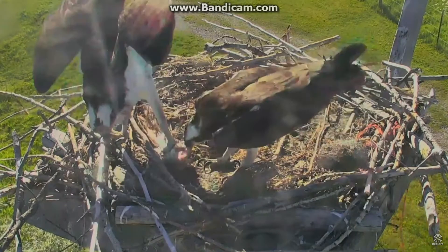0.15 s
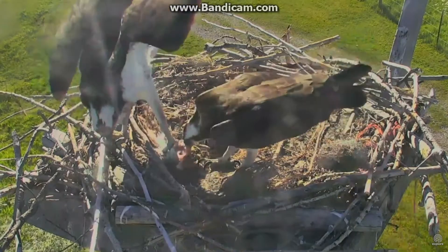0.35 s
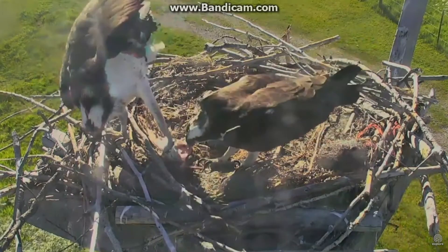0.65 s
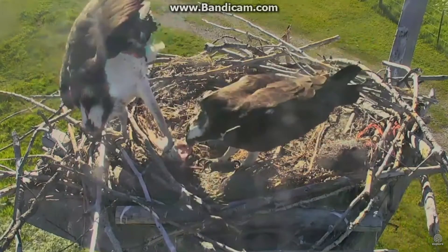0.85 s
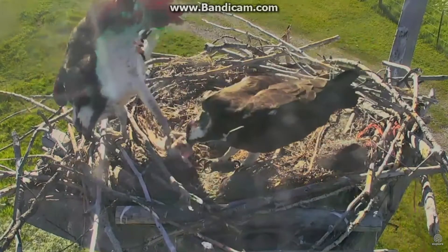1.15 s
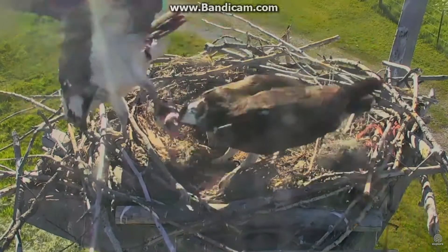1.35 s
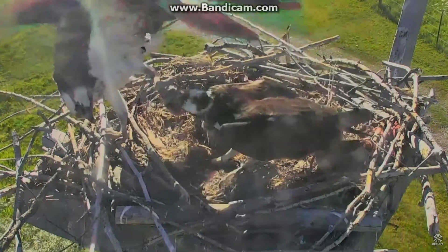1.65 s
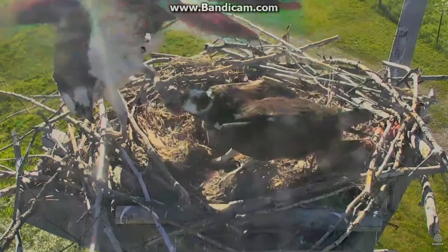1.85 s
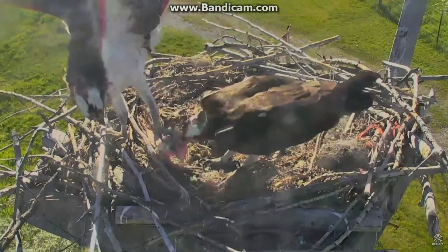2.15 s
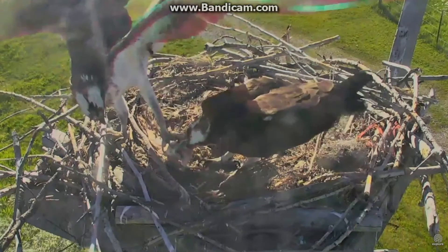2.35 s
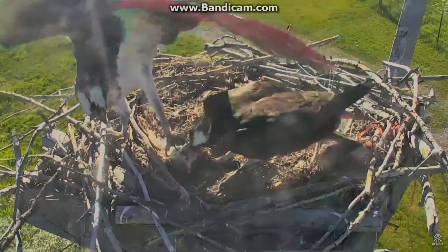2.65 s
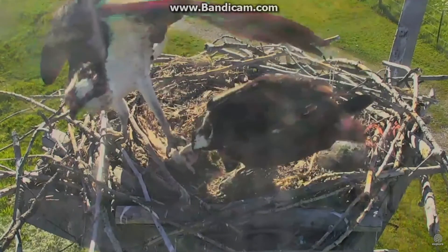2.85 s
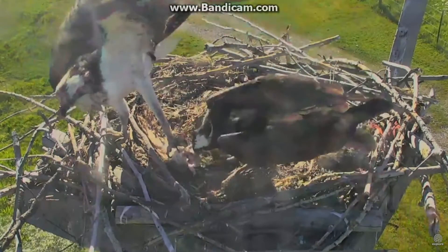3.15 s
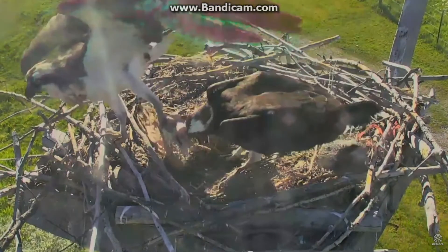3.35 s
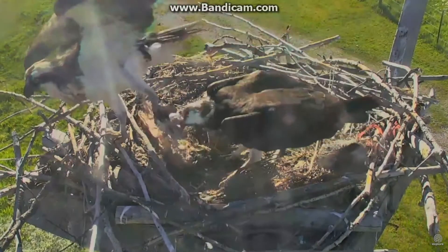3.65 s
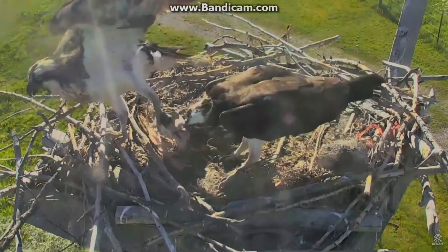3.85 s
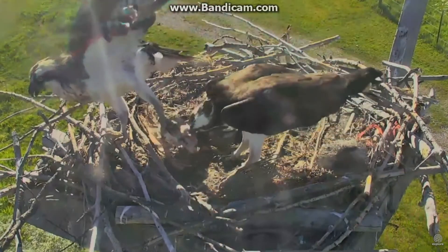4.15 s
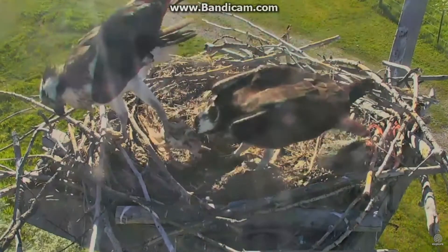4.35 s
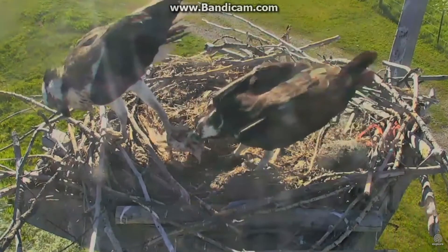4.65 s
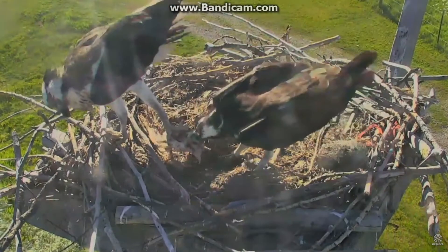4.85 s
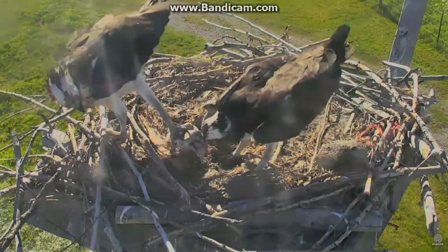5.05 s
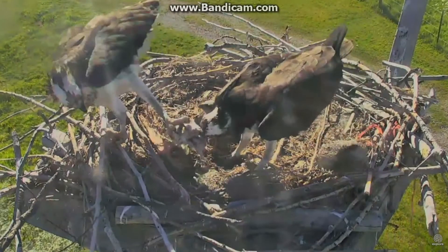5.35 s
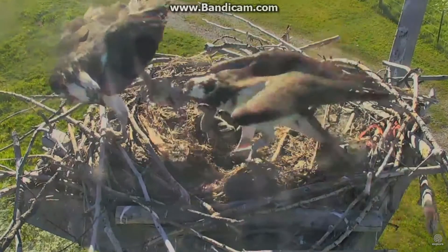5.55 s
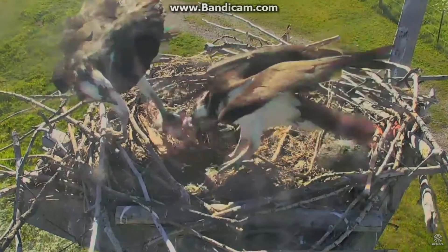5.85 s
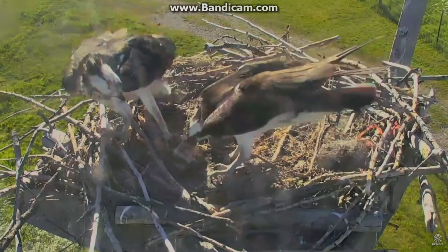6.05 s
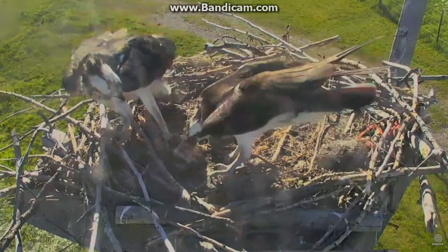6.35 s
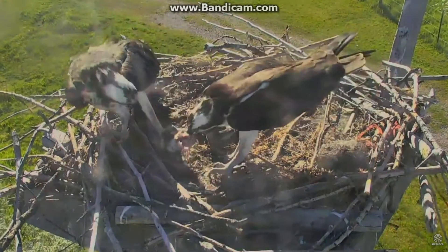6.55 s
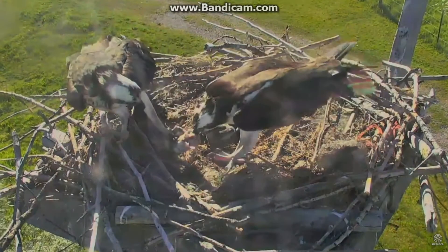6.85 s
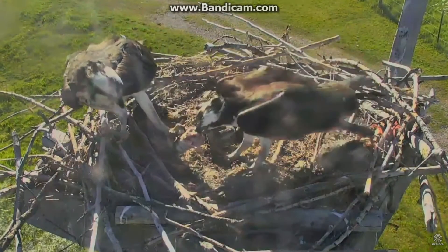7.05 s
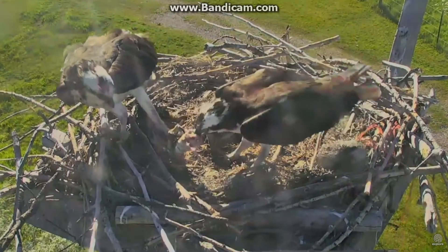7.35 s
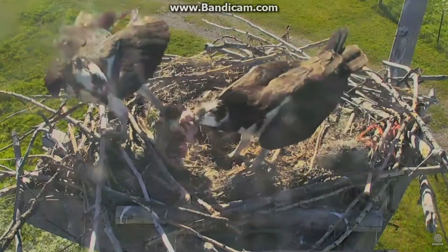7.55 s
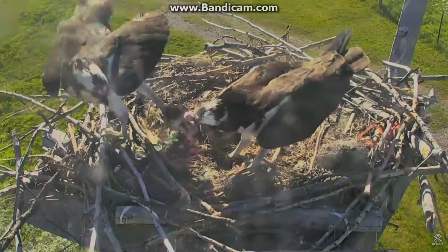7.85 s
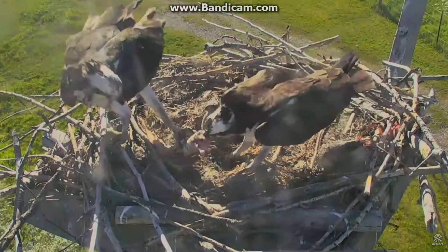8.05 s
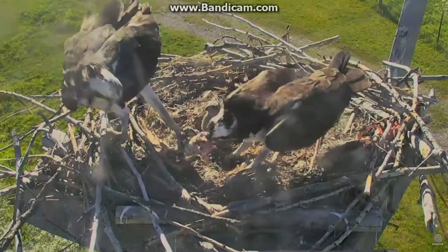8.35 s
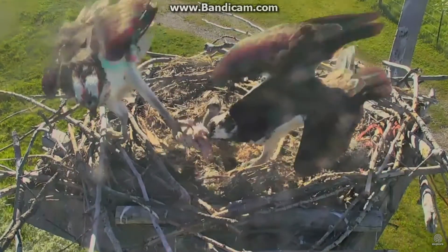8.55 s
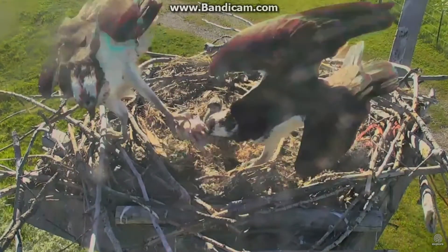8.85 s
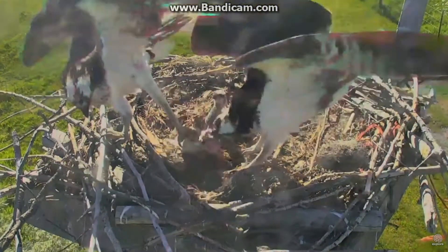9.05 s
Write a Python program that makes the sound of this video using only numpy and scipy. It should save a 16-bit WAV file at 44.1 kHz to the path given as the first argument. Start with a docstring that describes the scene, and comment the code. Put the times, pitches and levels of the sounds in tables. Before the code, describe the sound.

Two ospreys at an open-air nest give piercing, rapid whistled chirps that crack and rasp, very close and overloaded, over faint wind and rustling.

```python
"""Two ospreys call at their nest, close to one overloaded microphone.
Piercing whistles, near sines with an octave, break into low yelps, half tones and rasp until about 4.3 s.
After a pause they resume at 5 s; near 6.4 and 7.5 s the mate's tone joins in and the overload mixes the two.
Throughout, thin songbird tones, crackling rustles, decaying twig snaps and coloured wind noise lie behind.
Gain control pulls the background down after each call, and it recovers as the held level sinks."""
import sys
import numpy as np
from scipy import signal
from scipy.fft import rfft, irfft
from scipy.io import wavfile
from scipy.ndimage import uniform_filter1d

SR = 44100
rng = np.random.default_rng(int(sys.argv[2]) if len(sys.argv) > 2 else 0)


def int16_out(signal):
    """Quantize to a 16-bit WAV file."""
    q = np.round(np.clip(np.atleast_2d(signal).T, -1, 1) * 32767)
    wavfile.write(sys.argv[1], SR, q.astype(np.int16))


N = 405279
T = np.arange(N) / SR  # s

# Colour the throat gives the hoarse voice. Each row: frequency in hertz, relative level in dB.
THROAT = [(440, -78), (750, -50), (1340, -16.5), (1490, -38), (1900, -8), (2360, -36), (2710, -50),
          (3300, -2.5), (5330, -20), (6500, -19), (8450, -6.5), (14300, -120)]
# Curve of scoop and droop: power, extra power per second of note length
NOTE_BEND = (2, 0)
# Hertz under the top of a note at which the voice is 10 dB down: before the top, after it
WHISTLE_REACH = (261, 215)


def gain_of(db):
    """Decibel law: 20 dB is a factor of ten in amplitude."""
    return 10 ** (np.asarray(db) / 20)


def read(points, hz):
    """Logarithmic frequency scale: a level is interpolated along it between the points."""
    f, value = np.transpose(points)
    return np.interp(np.log(hz + 1), np.log(f + 1), value)


def noise(spectrum):
    """Spectral shaping: white noise takes the given colour, at rms 1."""
    white = rfft(rng.standard_normal(N))
    colour = gain_of(read(spectrum, np.fft.rfftfreq(N, 1 / SR)))
    x = irfft(white * colour, N)
    return x / x.std()


def gate(spans, edge_s):
    """Envelope: one inside any span, with edges softened by two running means."""
    inside = sum((T >= a) & (T <= b) for a, b in spans) > 0
    size = max(round(edge_s * SR), 1)
    return uniform_filter1d(uniform_filter1d(inside * 1., size), size)


def track(notes, bend, reach_hz, edge_s):
    """Frequency modulation: notes scoop, drift and droop; level follows pitch, phase is its integral."""
    edge_sag = .1  # share by which the pitch sags while the voice sets in or breaks off
    fall_power = 1.67  # the loss grows faster than the pitch drops
    curves = np.zeros((3, N))
    # First with margins, latest note first; then each note's own stretch on top
    for margin_s in (.015, 0):
        ordered = notes[::-1 if margin_s else 1]
        for start, length, held_hz, scoop_hz, droop_hz, level_db, fade_db, *more in ordered:
            drift_hz, octave_db = more or (0, 0)
            first = max(round((start - margin_s) * SR), 0)
            at = slice(first, round((start + length + margin_s) * SR))
            done = np.clip((T[at] - start) / length, 0, 1)
            power = bend[0] + bend[1] * length
            hz = held_hz + drift_hz * (done - .5)
            hz = hz - scoop_hz * (1 - done) ** power - droop_hz * done ** power
            before_top = done < done[hz.argmax()]
            under = (hz.max() - hz) / np.where(before_top, *reach_hz)
            db = level_db - 10 * under ** fall_power - fade_db * done ** 2
            curves[:, at] = hz, db, db + octave_db
    hz, db, octave_db = uniform_filter1d(curves, size=260)
    spans = np.array([(row[0] + .003, row[0] + row[1] + .003) for row in notes])
    # Notes that nearly touch are slurred together
    slurred = np.flatnonzero(abs(spans[1:, 0] - spans[:-1, 1]) < .013)
    spans[slurred, 1] = spans[slurred + 1, 0] + .001
    sounding = gate(spans, edge_s)
    hz = hz * (1 - edge_sag * (1 - sounding))
    turns = np.cumsum(hz) / SR
    return turns, hz, sounding * gain_of(db), sounding * gain_of(octave_db)


def tone(turns):
    """Simple harmonic motion: a sinusoid of rms 1, its phase given in turns."""
    return np.sqrt(2) * np.cos(2 * np.pi * turns)


def whistles():
    """Self-sustained membrane: a near sine; strain makes it repeat every few cycles or change pattern."""
    # Upper-register notes. Each row: start in seconds, length in seconds, held pitch in hertz,
    # scoop up in hertz, droop in hertz, level in dB, fade in dB, drift in hertz, octave in dB re whistle.
    upper_notes = [(0.0, 0.067, 2455, -40.0, -110.0, 3.5, 5, 86, -12.5),
                   (0.065, 0.11, 2840, 150.0, 380.0, 3.5, -6, -190.0, -12),
                   (0.535, 0.061, 2526, 19.5, 198.5, 1.5, 6.0, -110.0, -7.5),
                   (0.61, 0.097, 3187, 410.0, 230.5, 8.5, 5.5, 203, -30),
                   (0.705, 0.075, 2580, -180.0, 290.0, 11, -11, -100.0, -2),
                   (0.915, 0.057, 2543, 60.5, 160.5, 2.0, 3.5, -5.5, -2),
                   (0.97, 0.078, 2144, -190.0, -420.0, -1.5, -3, -180.0, -1),
                   (1.04, 0.078, 2787, 200.0, 580.0, 14.5, 2, -150.0, -3.5),
                   (1.268, 0.067, 2510, 80.0, 280.0, 6, 10, -170.0, -9.5),
                   (1.378, 0.06, 2713, 220.0, 410.0, 14, -3.5, -200.0, -7),
                   (1.733, 0.065, 2798, 350.0, 550.0, 16, -5, -300.0, -9.5),
                   (1.895, 0.077, 2570, 260.0, 100.5, 3, -9, 23, -13.5),
                   (1.985, 0.094, 2550.0, 70.0, -110.0, 11.5, 8, -250.0, -17),
                   (2.08, 0.074, 2830, 360.5, 460.0, 17, -9.5, -320.0, -14.5),
                   (2.293, 0.1, 2815, 320.0, 160.0, 16, 3, -180.0, -14),
                   (2.4, 0.066, 2756, 230.0, 449.5, 13.5, -11.5, -250.0, -11),
                   (2.632, 0.075, 2509, 31.5, 260.0, 4.5, 8.0, -110.0, -13.5),
                   (2.743, 0.056, 2746, 160.0, 290.0, 17.5, -0.5, -280.0, -15.5),
                   (2.978, 0.14, 2806, 270.0, 320.0, 15.5, -8.5, -150.0, -13),
                   (3.118, 0.056, 2450, 21.5, 260.0, 8, 1.5, -92, -12.0),
                   (3.537, 0.045, 2518, 40.0, 169.5, 7, 12, 23, -21),
                   (3.58, 0.073, 1943, -240.0, -520.0, 14.5, 19.5, 109, -3.5),
                   (3.665, 0.09, 2640.0, 230.0, 190.0, 11.5, -5, -160.0, -19.5),
                   (4.008, 0.27, 2690, 60.0, 250.0, 6, 4.5, 267, -13.5),
                   (5.05, 0.086, 2460, 179.5, -20.0, 2, -4, -420.0, -7.5),
                   (5.14, 0.05, 2513, 50.5, 370.0, 6, 11, -200.0, -1),
                   (5.463, 0.044, 2522, 29.5, 229.5, 2.5, -5.5, -140.0, -9.5),
                   (5.715, 0.073, 2406, 100.0, -270.0, 3.5, 8, -460.0, -10),
                   (5.8, 0.047, 2604, 100.5, 230.0, 10.5, 4, -160.0, -10),
                   (5.935, 0.12, 2693, 410.0, 109.5, 4.5, -1.5, -40.5, -11.5),
                   (6.05, 0.089, 2517, -0.0, -130.0, 13, 0.0, -360.0, -13.5),
                   (6.14, 0.071, 2840, 536, 610.0, 12.5, -11.5, 20.5, -13),
                   (6.25, 0.245, 2927, 249.5, 470.0, 8, -2.5, 100.5, -25),
                   (6.505, 0.066, 2726, 140.0, 470.0, 16.5, -12, -220.0, -11),
                   (6.735, 0.084, 2703, -130.0, 200.0, 13, 5, 580.0, -19.5),
                   (6.83, 0.07, 2747, -11.5, -120.0, 9, 1, -60.0, -8.5),
                   (6.9, 0.122, 2945, 120.0, 489, 13, -3.5, -10.0, -27),
                   (7.065, 0.15, 2863, 101.5, 430.5, 17.5, -7, -70.5, -14),
                   (7.345, 0.26, 2694, 89.5, 229.5, 9, 3.5, 110.0, -13),
                   (7.728, 0.18, 2822, 160.0, 391.5, 9, -9, 20.0, -12),
                   (8.03, 0.195, 2719, 150.0, -120.0, 12, -1, -140.0, -12.5),
                   (8.22, 0.17, 2899, 105, 739.5, 12.5, -4, 100.5, -20.5),
                   (8.46, 0.045, 2884, 137, -29.5, -4.0, 8.0, 41, -17),
                   (8.508, 0.051, 2603, 125.5, 240.5, 13, 11, -180.0, -4.5),
                   (8.675, 0.069, 2684, 349, 448.5, 1.5, 0, -32, -18),
                   (8.78, 0.12, 2868, 128, 622.5, 5.5, -2.5, -61.5, -12.5),
                   (8.898, 0.032, 2493, -13, 329, 18, 16, -150.0, -10),
                   (9.08, 0.091, 2715, 110.0, 382, 16.5, 10, 133.5, -16.5),
                   (9.165, 0.024, 2814, 562, 130.0, 2.5, 0.0, 90.0, -13.0)]
    # Strained stretches. Each row: start in seconds, end in seconds, rasp drive in dB before mixing,
    # cycles per repeat, undertones in dB re whistle before the surges.
    strained = [(0.057, 0.182, -7, 3, -31), (0.638, 0.8, -11, 2, -29), (1.892, 1.983, -23, 4, -11.5),
                (3.111, 3.176, -18.5, 4, -13), (3.536, 3.68, -16.5, 2, -6), (3.661, 3.781, -17, 4, -42),
                (4.001, 4.141, -9, 4, -37), (4.113, 4.271, -11, 6, -11), (5.721, 5.79, -23.5, 2, -17.5),
                (5.802, 5.859, -25, 4, -27), (5.941, 6.054, -9.5, 4, -14), (6.25, 6.4, -13.5, 4, -22),
                (6.367, 6.442, -18, 8, -11), (6.431, 6.506, -10.5, 4, -29), (6.731, 6.921, -9.5, 2, -39),
                (6.876, 7.025, -15.5, 2, -50), (7.112, 7.207, -69, 2, -37), (7.342, 7.614, -8.5, 2, -16),
                (7.729, 7.791, -27, 3, -41), (7.784, 7.899, -28, 2, -46.5), (8.015, 8.254, -14, 6, -43),
                (8.201, 8.387, -12, 2, -18), (8.661, 8.737, -7, 2, -26.5), (8.774, 8.881, -3, 2, -12.5),
                (9.154, 9.185, -5.5, 2, -23)]
    turns, hz, level, octave = track(upper_notes, (2.5, 20), WHISTLE_REACH, edge_s=0.0065)
    rasp = np.full(N, gain_of(-32.5))
    under, broken = np.zeros(N), np.zeros(N)
    slip = 0.085 * noise([(5, 10.5), (40, 15), (200, -66)])  # turns: the held pattern wanders
    for a, b, rasp_db, cycles, under_db in strained:
        at = slice(round(a * SR), round(b * SR))
        window = signal.windows.tukey(len(T[at]), .4)
        rasp[at] += gain_of(rasp_db) * window
        comb = undertones(turns[at] + slip[at], hz[at], round(cycles), scatter_db=-1.5)
        under[at] += gain_of(under_db) * window * comb
    span = 1800  # samples
    # In the rasp a new repeat pattern takes over every 20 ms
    for start in range(0, N - span, span // 2):
        at = slice(start, start + span)
        if rasp[at].max() > .03 and hz[at].min() > 0:
            comb = undertones(turns[at], hz[at], rng.integers(2, 8), scatter_db=7.0)
            broken[at] += np.sqrt(np.hanning(span)) * comb
    surge = gain_of(0.74 * noise([(5, -2.5), (40, 29.5), (150, -19)]))  # strain comes in bursts
    erratic = [(20, 5.0), (150, 8.5), (700, 2.5), (1500, -8.5), (3000, -66)]
    shiver_hz = 60 * rasp * noise([(10, -7), (30, 1.0), (80, -1.5), (200, -31.5)])
    waver = np.cumsum(shiver_hz) / SR
    turns = turns + waver + 0.081 * rasp * surge * noise(erratic)
    flutter = gain_of(1.1 * noise([(10, -3), (40, 0), (120, -8), (400, -40)]))  # the level wavers
    swing = flutter + 0.94 * rasp * surge * noise(erratic)
    hoarse = rasp * (0.78 * broken + 0.38 * noise(THROAT)) + under
    clear = level * tone(turns) + octave * tone(2 * turns + 0.17)
    return swing * clear + level * surge * hoarse


def undertones(turns, hz, cycles, scatter_db):
    """Subharmonics: a vibration that repeats only every few cycles has lines between its overtones."""
    k = np.array([k for k in range(1, 3 * cycles) if k % cycles])[:, None]
    throat_db = read(THROAT, hz.mean() * k / cycles)
    size = gain_of(throat_db + scatter_db * rng.standard_normal(k.shape))
    lines = size * tone(turns * k / cycles + rng.random(k.shape))
    comb = lines.sum(0)
    return comb / (comb.std() + 1e-9)


def yelps():
    """Harmonic series of a slack, shaky membrane: the octave is about as strong as the pitch."""
    # Lower-register notes that open and close the calls. Each row: start in seconds, length in seconds,
    # held pitch in hertz, scoop up in hertz, droop in hertz, level in dB, fade in dB.
    lower_notes = [(0.1, 0.061, 1870.0, -91, -59.5, -12, 0), (0.165, 0.026, 1780, -110.0, 269.5, 1, 4),
                   (0.503, 0.13, 1745, 100.5, 20.0, -4.5, 12.5), (0.645, 0.1, 1830, 20.5, 19, -13, 30),
                   (0.745, 0.053, 1880.0, 101.5, 418.5, -11.5, -5),
                   (3.17, 0.017, 1578, -30.0, 91, -14.5, 23), (3.51, 0.03, 1652, -60.5, -140.0, 0, 13),
                   (3.758, 0.021, 1655, -120.0, 138.5, 3.5, 17),
                   (4.125, 0.13, 1810.0, -18, -160.0, -8.5, 2.5),
                   (4.26, 0.046, 1823, -120.0, 281, -0.5, -1.5),
                   (5.04, 0.017, 1902, 100.5, 109.5, -13.5, 8.0), (6.225, 0.038, 1888, 285, 163, -6, 11),
                   (6.495, 0.025, 1702, -56.5, 313.5, -2.5, 15), (6.738, 0.028, 1898, 307.5, 62, 1, 23),
                   (7.022, 0.023, 1718, -53, 173.5, -2.5, 9), (7.047, 0.024, 2040, 32, 12.5, 0, 11.5),
                   (7.328, 0.027, 1669, -130.0, -390.0, 2, 15.5),
                   (7.607, 0.023, 1796, -19.5, 289, -0.5, 13), (7.73, 0.033, 2075, 145, 22, -10.5, 8.5),
                   (7.897, 0.021, 1901, 6, 350.5, -6.5, 11), (8.005, 0.035, 1753, -37.5, -260.0, -2, 11.5),
                   (8.37, 0.028, 1707, -180.0, 261.5, 4, 6), (8.875, 0.018, 1591, -240.0, 200.5, 0.5, 9),
                   (9.14, 0.05, 2033, 368.5, 78, -5, 8.5)]
    # Harmonics of the yelp. Each row: multiple of the pitch, gain in dB.
    overtones = [(1, 7.5), (2, 5.5), (3, -4.5), (4, -7.5), (5, -56)]
    turns, _, level, _ = track(lower_notes, NOTE_BEND, (530, 225), edge_s=0.0045)
    turns = turns + 0.032 * noise([(20, 17.5), (200, -8), (800, -13), (2000, -30)])
    return level * sum(gain_of(db) * tone(round(k) * turns) for k, db in overtones)


def mate():
    """Intermodulation: a second whistle just under the first, mixed into a comb by the overload."""
    # The mate's notes where both call at once. Each row: start in seconds, length in seconds,
    # held pitch in hertz, scoop up in hertz, droop in hertz, level in dB, fade in dB.
    mate_notes = [(6.375, 0.07, 2687, 171.2, 199.5, 7, 7), (7.5, 0.06, 2682, 30.1, 155, 12, 6)]
    turns, _, level, _ = track(mate_notes, NOTE_BEND, WHISTLE_REACH, edge_s=0.007)
    return level * tone(turns)


def songbirds():
    """Amplitude modulation: small birds' thin tones flutter, as if from echoes across the field."""
    # Notes of small birds further off. Each row: start in seconds, length in seconds,
    # held pitch in hertz, scoop up in hertz, droop in hertz, level in dB, fade in dB.
    song = [(0.27, 0.039, 4530, -300.0, -500.0, -38, -2), (0.32, 0.05, 3370.0, -1940.0, -320.0, -30.0, 8),
            (0.37, 0.092, 3520, -350.0, 521.5, -28.5, 2.0), (1.33, 0.037, 3580, 84.5, 383, -4, 7),
            (1.814, 0.052, 4050, 8.5, -40.0, -35, -3), (2.56, 0.05, 4300, 851, 240, -26, 3),
            (2.706, 0.029, 3470, 157, 230.0, -7, 2.0), (3.191, 0.066, 2840, -890.0, -1590.0, -28, -5),
            (3.258, 0.052, 2700, -1290.0, -480.0, -27.5, 2.0), (3.333, 0.045, 4090, 577, -95, -29, -1),
            (3.425, 0.024, 4100, -1380.0, 265, -28, 20), (3.454, 0.049, 3100, -1930.0, 48, -29.5, 2.0),
            (4.53, 0.096, 3340, -1040.0, -270.0, -34.5, 5),
            (4.593, 0.025, 2300, -190.0, -140.0, -32.0, 2.0), (4.641, 0.43, 3370, 260, 205, -37, 2.0),
            (4.703, 0.29, 2953, 194, 170.0, -42, -4), (5.2, 0.3, 2900.0, -170.0, -450.0, -34.5, -3),
            (5.375, 0.023, 2184, -150.0, -150.0, -29, -9), (6.601, 0.12, 2457, 2.5, -180.0, -44.5, -2),
            (7.926, 0.058, 2690.0, -87, -100.0, -39, 2.0), (8.848, 0.045, 3910, 845.5, 685, -1, 3.5)]
    out = np.zeros(N)
    # Overlapping notes need two tracks, so alternate rows go to each
    for notes in (song[::2], song[1::2]):
        turns, _, level, _ = track(notes, NOTE_BEND, (np.inf, np.inf), edge_s=0.0057)
        flutter = gain_of(2.5 * noise([(10, 0), (60, 0), (150, -30)]))
        out += level * tone(turns) * flutter
    return out


def nest():
    """Friction and fracture: noise of erratic level crackles; twig snaps are noise decaying exponentially."""
    # Feathers and nest litter stirring. Each row: start in seconds, end in seconds, level in dB.
    rustles = [(1.129, 1.225, -22.5), (1.523, 1.735, -28.5), (2.212, 2.327, -27.5), (5.208, 5.368, -27.5),
               (8.396, 8.524, -20.5), (8.572, 8.783, -11)]
    # Colour of the rustling. Each row: frequency in hertz, relative level in dB.
    rustle_colour = [(180, -43), (300, -33), (841, -15.5), (1010, -15), (1880, -14), (3670, -9),
                     (15000, -17.5)]
    # Twig snaps. Each row: time in seconds, strength in dB before a common 7.5 dB cut.
    snaps = [(1.244, -13.5), (5.707, -7), (8.578, 6), (8.627, -2), (8.654, 2.5)]
    crackle = noise(rustle_colour) * gain_of(4.02 * noise([(20, -2.0), (150, -7.5), (400, -71)]))
    stirring = sum(gain_of(db) * gate([(a, b)], edge_s=0.01) for a, b, db in rustles)
    out = crackle / crackle.std() * stirring
    for s, db in snaps:
        burst = noise([(150, -19), (400, -9), (2000, -13), (8000, -24.5)])
        decay = (T > s) * np.exp(-abs(T - s) / 0.0039)
        out += gain_of(db - 7.5) * burst * decay
    return out


def air():
    """Turbulence: lumpy low buffeting and a hiss, each with its own slowly changing level."""
    # Wind levels. Each row: time in seconds, buffeting in dB before its lumps, hiss level in dB.
    wind_levels = [(0, -49, -28), (.4, -39, -31.5), (1.3, -45, -27), (2.2, -32, -30), (3.4, -41, -29.5),
                   (4.3, -30, -30), (4.7, -29, -34), (5.05, -34, -27), (5.6, -39.5, -29.5),
                   (6.1, -28.5, -31.5), (6.65, -35, -30), (7.0, -25, -20.5), (7.4, -47.5, -32),
                   (8.2, -21.5, -37.5), (8.5, -30, -25.5), (9.19, -33, -28.5)]
    # Wind on the microphone. Each row: frequency in hertz, relative level in dB.
    buffet_colour = [(15, -65), (25, -31), (43, 3), (102, 5), (195, -18), (250, -14.5), (320, -52),
                     (550, -120)]
    # Hiss of wind in grass and sticks. Each row: frequency in hertz, relative level in dB.
    hiss_colour = [(120, -39), (200, -2), (1730, 3.5), (2230, -0.5), (3220, 3), (4810, 2), (11400, -5.5),
                   (15800, -4.5)]
    s, buffet_db, hiss_db = np.transpose(wind_levels)
    lumps_db = 3.6 * noise([(1, 22), (10, -8), (30, -61)])
    buffet = gain_of(np.interp(T, s, buffet_db) + lumps_db) * noise(buffet_colour)
    hiss = gain_of(np.interp(T, s, hiss_db)) * noise(hiss_colour)
    return buffet + hiss


def scene():
    """Superposition: the sources add, alike in both channels."""
    birds = whistles() + yelps() + mate() + songbirds()
    return np.tile(birds + nest() + air(), (2, 1))


def record(dry):
    """Compression and distortion: gain control, a lopsided overload with overtones and thumps, band limit."""
    power_db = 10 * np.log10(abs(uniform_filter1d(dry[0] ** 2, 200)) + 1e-12)
    fall = T * 27.5  # the held level sinks by this many dB a second
    held_db = np.maximum.accumulate(np.minimum(power_db, -12) + fall) - fall
    quick_db = uniform_filter1d(np.clip(0.38 * (held_db + 37.5), 0, 11), 100)
    memory = np.exp(-1 / (.4 * SR))  # long calls build up a slower cut
    loud_share = signal.lfilter([1 - memory], [1, -memory], power_db > -20, zi=[.5])[0]
    slow_db = 4.78 * loud_share
    ducked = dry[0] / gain_of(quick_db + slow_db)
    # The overload runs at twice the sample rate
    fine = signal.resample_poly(ducked, up=2, down=1)
    ceiling, knee = .77, 3.0
    fine = fine / (1 + abs(fine / ceiling) ** knee) ** (1 / knee)
    # The square adds even overtones; its running mean shifts the bias with loudness
    fine += 0.082 * fine ** 2 + 0.22 * uniform_filter1d(fine ** 2, size=900)
    out = signal.resample_poly(fine, up=1, down=2)
    out = signal.lfilter(*signal.butter(1, 15, "high", fs=SR), out)
    low_pass = signal.firwin(511, 15900, window=("kaiser", 9), fs=SR)  # cutoff in Hz
    out = signal.oaconvolve(out, low_pass, "same")
    return np.tile(np.clip(out, -1, 1), (2, 1))


dry = scene()
out = record(dry)
int16_out(out)
```